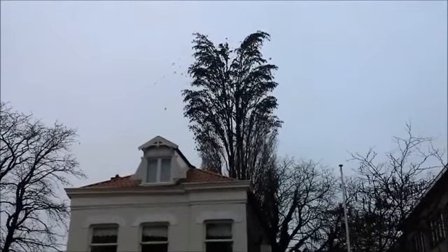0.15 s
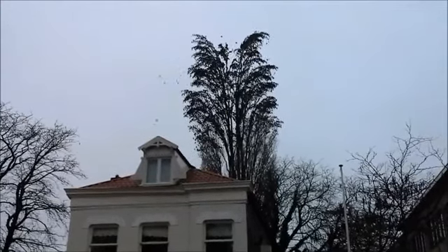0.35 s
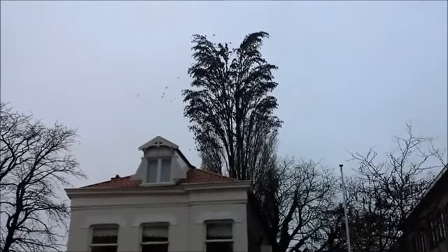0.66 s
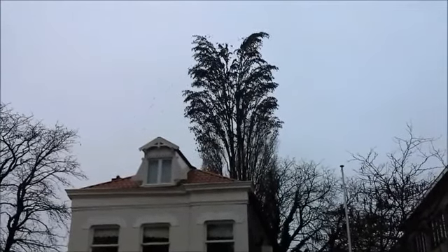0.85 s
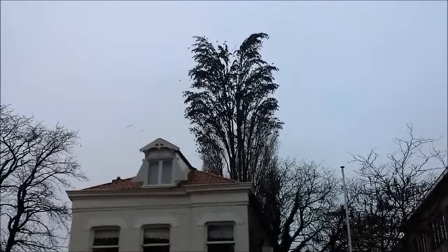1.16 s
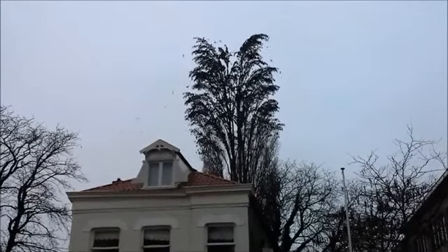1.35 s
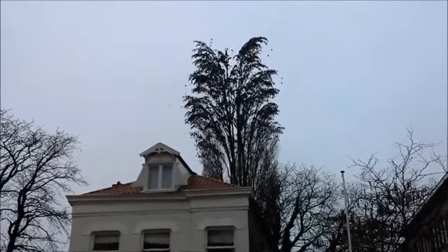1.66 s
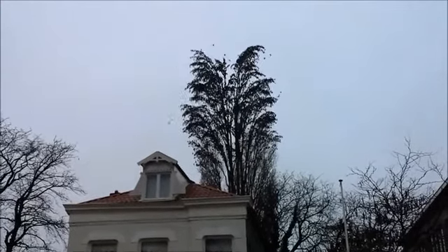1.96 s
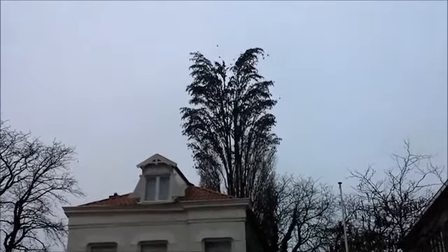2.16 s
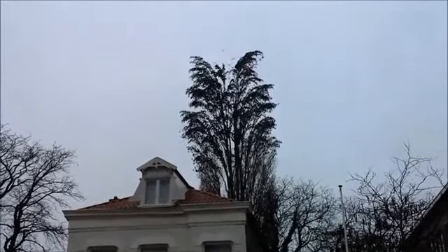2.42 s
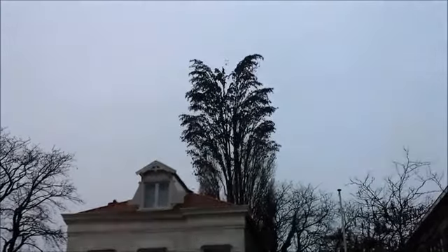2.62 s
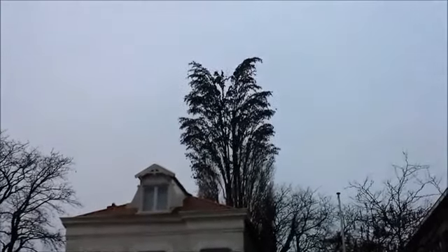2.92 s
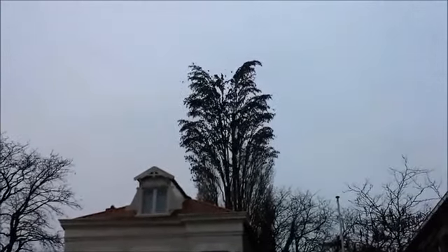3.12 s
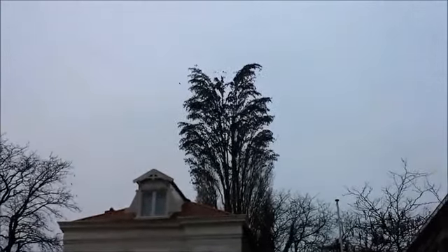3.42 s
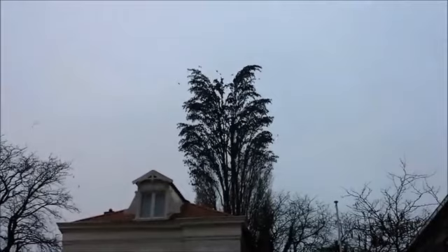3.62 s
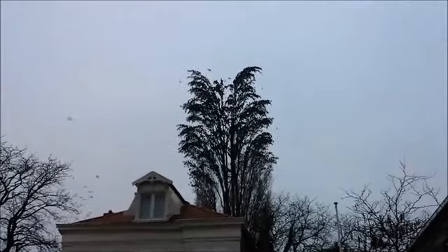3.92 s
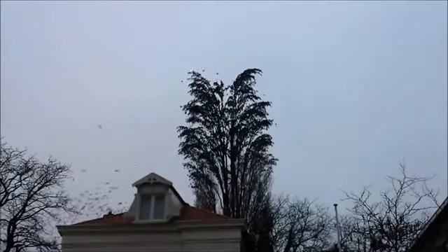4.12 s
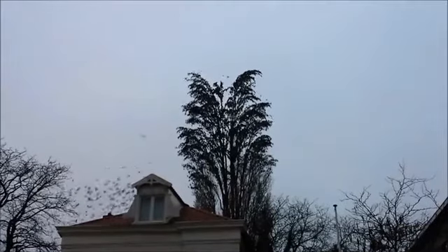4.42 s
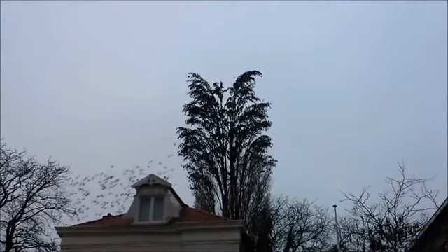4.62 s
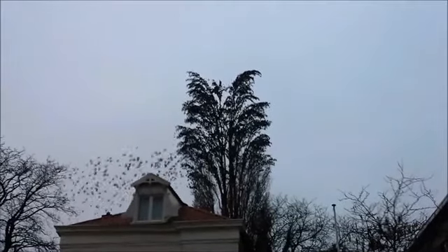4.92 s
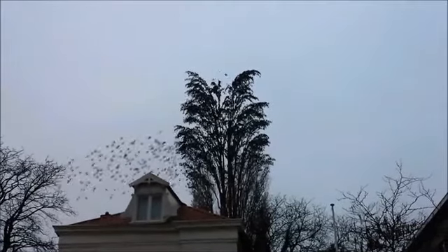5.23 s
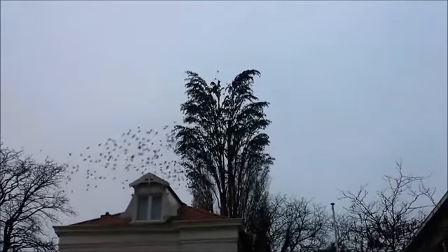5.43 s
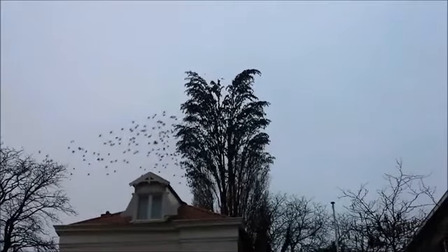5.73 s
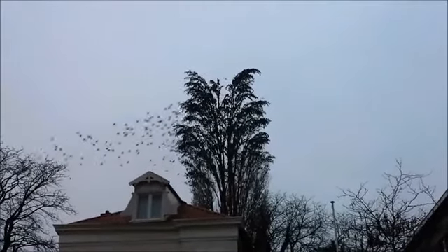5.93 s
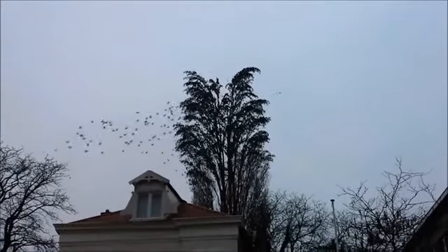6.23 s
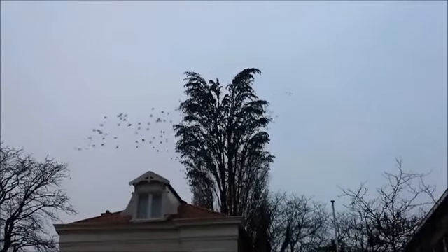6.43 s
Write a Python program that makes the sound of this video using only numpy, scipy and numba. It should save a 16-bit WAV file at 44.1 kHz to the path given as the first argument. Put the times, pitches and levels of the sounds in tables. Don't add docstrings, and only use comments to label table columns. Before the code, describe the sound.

A very large flock of starlings fills a tall tree beyond a house with continuous shrill chatter. Nearer birds poke out with rough squeaks, thin seeps, quick squabbles and bent whistles, while countless others blur into a bright hiss. Distant traffic and wavering engine hums lie low underneath, with slight wind and a few dull knocks. Small stereo camera microphone outdoors, some distance away, with short diffuse echoes and dull extreme treble.

```python
import sys
import numpy as np
from scipy import signal
from scipy.fft import rfft, irfft, next_fast_len
from scipy.io import wavfile
from scipy.ndimage import uniform_filter1d
from numba import njit

SR = 44100
rng = np.random.default_rng(int(sys.argv[2]) if len(sys.argv) > 2 else 0)


def voltage_ratio(level):
    return 10 ** (np.asarray(level, float) / 20)


def wav_record(signal):
    frames = np.transpose(np.atleast_2d(signal))
    bounded = np.clip(frames, -1, 1)
    quanta = np.round(bounded * 32767).astype(np.int16)
    wavfile.write(sys.argv[1], SR, quanta)


N = 289737
T = np.arange(N) / SR

# hz [Hz], level_db [dB per Hz]
CROWD_COLOUR = [(760, -50.5), (1300, -20), (1690, -15.0), (2260, -9), (3520, -12.5), (4620, -6.5),
                (5770, -4.5), (6420, -1.5), (7030, 0.5), (8020, -7.5), (8850, -13.5), (9300, -21),
                (9900, -21.5), (10400, -63.5)]
CROWD_DB = -26.5
# hz [Hz], left_lead [radians]
PORT_LEAD = [(1500, -2.5), (2000, 1.3), (3500, 1.1), (4300, -0.5), (5250, -0.6), (6000, -1.27), (7000, -1),
             (8300, 0.4)]
# hz [Hz], left_minus_right_db [dB]
BALANCE_DB = [(60, -0.5), (100, -1.0), (180, -1.0), (320, -1.0), (560, -1.5), (980, -1.0), (1710, 0.0),
              (2990, 0.0), (5230, -0.5), (9140, -5.0)]


def along(table, column=1):
    return np.interp(T, *np.array(table)[:, [0, column]].T)


def at_hz(table, hz):
    return np.interp(np.log(hz), np.log(np.array(table)[:, 0]), np.array(table)[:, 1])


def level(x, db):
    return x * voltage_ratio(db) / np.sqrt(np.mean(x ** 2))


def walk(rate):
    hold = int(SR / rate)
    steps = np.repeat(rng.standard_normal(N // hold + 1), hold)
    smooth = uniform_filter1d(uniform_filter1d(steps, hold), hold)[:N]
    return smooth / smooth.std()


def effort_db(s, hz):
    # time_s [s], high_squeaks_db [dB], lower_chatter_db [dB]
    efforts = [(0.0, -25.5, -29.5), (0.79, -27.5, -30.5), (1.06, -24.5, -29.5), (1.45, -28.5, -29.5),
               (1.8, -26, -33), (1.9, -28, -30.5), (2.38, -26.5, -31), (2.87, -25.5, -31.5),
               (3.04, -24, -30), (3.46, -25.5, -29.5), (3.82, -24, -28.5), (4.0, -25, -31.5),
               (4.46, -25.5, -30), (5.2, -27, -30), (5.35, -24.5, -31), (5.65, -27.5, -30.5),
               (6.1, -26, -30.5), (6.57, -28, -30.5)]
    high, low = (np.interp(s, T, c - c.mean()) for c in (along(efforts), along(efforts, column=2)))
    share = np.clip((hz - 5400) / 800, 0, 1)
    return (share * high + (1 - share) * low) * np.clip((hz - 2800) / 1200, 0, 1)


@njit
def sing(notes, waver, flutter, edge):
    out = np.zeros((2, N))
    for start, length, first, last, bend, left, right, lead, offset in notes:
        phase = 0.
        for i in range(max(0, int(-start)), min(int(length), N - int(start))):
            u = i / length
            k = (i + int(offset)) % N
            hz = first + (last - first) * u + 4 * bend * u * (1 - u) + waver[k]
            phase += 2 * np.pi * hz / SR
            size = min(1., u / edge, (1 - u) / edge) * flutter[k]
            out[0, int(start) + i] += left * size * np.sin(phase + lead)
            out[1, int(start) + i] += right * size * np.sin(phase)
    return out


def calls(s, length, first_hz, last_hz, bend_hz, db, pan_db, spread, waver_hz, flutter_db, edge):
    chance = rng.random((len(s), 2)).T
    lead = at_hz(PORT_LEAD, (first_hz + last_hz) / 2) + spread * (2 * chance[0] - 1)
    left, right = voltage_ratio(db + pan_db / 2), voltage_ratio(db - pan_db / 2)
    notes = np.array([s * SR, length * SR, first_hz, last_hz, bend_hz, left, right, lead, chance[1] * N])
    waver = waver_hz * (walk(350) + .25 * walk(40))
    return sing(np.ascontiguousarray(notes.T), waver, voltage_ratio(flutter_db * walk(120)), edge)


def peeps(count=90):
    middle_hz, spread_hz, crowding = 7100, 900, 4
    chance, bell = rng.random((count, 2)).T, rng.standard_normal((count, 2)).T
    odds = np.cumsum(voltage_ratio(crowding * effort_db(T, middle_hz)))
    s = np.interp((np.arange(count) + chance[0]) / count, odds / odds[-1], T)
    hz = middle_hz + spread_hz * np.tanh(bell[0])
    return np.array([s, 0.0494 * (0.66 + chance[1]), hz, hz + 120 * bell[1]])


def voiced(notes, near_db):
    hz = (notes[2] + notes[3]) / 2
    db = near_db + 0.72 * at_hz(CROWD_COLOUR, hz) + 0.49 * effort_db(notes[0], hz)
    return np.vstack([notes, db])


def near_calls(notes, **manner):
    s, length, first, last, db = notes
    pan_db = np.clip(-7 * ((first + last) / 2 - 6500) / 1000, -6.5, 2)
    return calls(s - .005, length + .01, first, last, 0 * s, db + .7, pan_db, **manner)


def near_birds():
    # start_s [s], length_s [s], first_hz [Hz], last_hz [Hz]
    squeaks = [(0.163, 0.11, 7670, 7800), (0.245, 0.12, 6460, 6670), (0.551, 0.055, 7380, 7400),
               (.422, 0.081, 7060, 7100), (0.703, 0.051, 6590, 6530), (0.877, 0.136, 7050, 7220),
               (1.11, 0.092, 7540, 7700), (1.2, .075, 6770, 6520), (1.695, 0.11, 6970, 7450),
               (1.704, 0.093, 6820, 6900), (1.793, 0.06, 7180, 6870), (2.657, 0.05, 6840, 7080),
               (2.716, 0.0265, 7500, 7490), (2.981, 0.073, 7220, 7230), (3.021, 0.095, 6940, 7070),
               (3.051, 0.11, 7520, 7350), (3.097, 0.057, 6750, 6820), (3.22, 0.047, 6770, 6600),
               (3.52, .057, 7070, 7060), (3.524, 0.1, 7450, 7300), (3.583, 0.098, 7050, 7370),
               (3.67, 0.12, 7220, 7030), (3.774, .112, 7440, 7350), (4.177, 0.17, 6350, 6960),
               (5.279, 0.045, 7520, 7360), (5.285, 0.096, 7120, 6780), (5.374, 0.19, 7040, 7400),
               (5.794, 0.053, 6300, 6800)]
    # start_s [s], length_s [s], first_hz [Hz], last_hz [Hz], level_db [dB]
    chatter = [(0.313, 0.082, 6900, 5500, -32), (0.344, 0.073, 4600, 4490, -38),
               (0.73, 0.16, 6540, 6300, -32), (0.934, 0.27, 6220, 6030, -34),
               (1.141, 0.017, 1800, 1810, -40), (1.781, 0.064, 6200, 6556, -26),
               (2.608, 0.165, 5890, 5450, -38), (2.67, .072, 5230, 4900, -39),
               (2.928, .122, 5984, 5420, -39), (3.096, 0.11, 6050, 6240, -29.5),
               (3.66, 0.145, 6000, 6200, -35), (3.67, 0.051, 5300, 5270, -37),
               (4.28, 0.07, 6080, 6053, -30), (4.351, 0.041, 5050, 4980, -32),
               (4.62, 0.052, 6212, 6380, -38), (5.556, 0.051, 4500, 4437, -40),
               (5.6, 0.072, 5090, 5080, -39), (5.686, .045, 4350, 4420, -43),
               (5.948, 0.144, 5470, 5650, -34)]
    # start_s [s], length_s [s], first_hz [Hz], last_hz [Hz]
    seeps = [(0.21, 0.085, 8350, 8300), (0.274, 0.15, 8620, 8460), (0.42, 0.072, 8420, 8180),
             (0.762, .07, 8060, 7650), (.816, .195, 8880, 8530), (1.014, 0.092, 7900, 7890),
             (1.231, 0.044, 7860, 8030), (1.27, .065, 8550, 8500), (1.745, 0.12, 7760, 7700),
             (2.727, 0.1, 8200, 7850), (3.02, 0.18, 7710, 7630), (3.091, 0.11, 8420, 8360),
             (3.697, 0.14, 8445, 8650), (4.04, .1, 8300, 8350), (4.076, 0.053, 8050, 7960),
             (4.16, 0.097, 7730, 8060), (4.648, 0.2, 8360, 8040), (4.649, 0.16, 9100, 8950),
             (4.687, 0.14, 8600, 8460), (4.869, 0.24, 7590, 8000), (5.279, 0.15, 8200, 7960),
             (5.403, 0.16, 8490, 8300)]
    # start_s [s], length_s [s], first_hz [Hz], last_hz [Hz], level_db [dB]
    strands = [(0.024, 0.072, 8850, 8950, -46), (0.522, 0.096, 8420, 8470, -43.5),
               (.71, .05, 8350, 8400, -41), (1.019, 0.166, 8700, 8550, -43),
               (1.316, .06, 8840, 8930, -44.5), (1.459, 0.053, 7940, 8120, -40),
               (1.552, .1, 7470, 7760, -34), (1.584, 0.069, 8600, 8500, -46), (1.9, .05, 6200, 6080, -33),
               (2.132, 0.071, 9300, 9400, -47), (2.417, 0.12, 9350, 9360, -47),
               (2.72, .09, 7600, 7600, -33), (3.087, .05, 9240, 9350, -45), (4.018, .11, 6540, 6260, -33.5),
               (4.3, 0.11, 9000, 9300, -45.5), (4.422, .07, 8800, 8820, -41.5),
               (4.558, .06, 9200, 9300, -47.5), (4.591, .08, 6750, 6200, -30.5),
               (5.168, 0.071, 8700, 8730, -39.5), (5.332, 0.1, 9050, 9150, -45),
               (5.559, 0.078, 7670, 7780, -38), (6.34, 0.033, 8000, 7950, -36),
               (6.394, .07, 6400, 6170, -37), (6.48, .07, 6300, 6400, -36)]
    thin = np.hstack([np.transpose(strands), voiced(np.transpose(seeps), -31), voiced(peeps(), -33)])
    rough = np.hstack([voiced(np.transpose(squeaks), -28.5), np.transpose(chatter)])
    return (near_calls(thin, spread=1.5, waver_hz=65, flutter_db=2.5, edge=0.14)
            + near_calls(rough, spread=1.36, waver_hz=95, flutter_db=3.0, edge=0.17))


def whistlers():
    # time_s [s], pitch_hz [Hz]
    whistles = [
        [(0.24, 6500), (0.3, 6690), (0.34, 6350), (0.38, 5660)],
        [(0.99, 7830), (1.04, 7600), (1.08, 8700), (1.12, 7820), (1.16, 7470)],
        [(2.04, 7070), (2.09, 8270), (2.14, 9070), (2.26, 8870), (2.35, 8800)],
        [(2.39, 5800), (2.44, 6000), (2.5, 6310), (2.58, 6200)],
        [(2.9, 7260), (2.95, 8040), (3.0, 8440), (3.05, 8970), (3.09, 8540)],
        [(3.85, 7390), (3.9, 7630), (3.95, 7920), (3.975, 7560), (4.005, 6870), (4.03, 6450), (4.06, 6280)],
        [(3.86, 7000), (3.9, 6810), (3.94, 6870), (3.97, 6700)],
        [(4.49, 8150), (4.52, 8200), (4.55, 8000), (4.59, 7800)],
        [(4.69, 6860), (4.745, 6900), (4.78, 8000), (4.81, 7300), (4.84, 6900)],
        [(4.86, 6000), (4.93, 6400), (4.97, 6500), (5.02, 6830)],
        [(4.84, 7380), (4.89, 7700), (4.97, 7880), (5.03, 7150)],
        [(5.42, 8230), (5.47, 8430), (5.53, 8230)],
        [(6.0, 7830), (6.04, 7950), (6.13, 7605), (6.29, 7060), (6.38, 6500)],
    ]
    nearness_db = [-28, -24.5, -29, -25, -24, -21, -26, -26, -27.5, -28, -27, -29, -26]
    out = np.zeros((2, N))
    waver_hz = 55 * walk(200) + 45 * walk(45)
    flutter_db = 3.2 * walk(70)
    for contour, near_db in zip(whistles, nearness_db):
        s, hz = np.transpose(contour)
        span = slice(int((s[0] - .01) * SR), int((s[-1] + .01) * SR))
        t = T[span]
        hz = uniform_filter1d(np.interp(t, s, hz), size=600)
        phase = 2 * np.pi * np.cumsum(hz + waver_hz[span]) / SR
        fade = np.clip(np.minimum(t - t[0], t[-1] - t) / 0.014, 0, 1)
        flutter = flutter_db[span] - flutter_db[span].mean()
        size = fade * voltage_ratio(0.76 * at_hz(CROWD_COLOUR, hz) + near_db - 1.5 + flutter)
        pan_db = at_hz(BALANCE_DB, hz) - 1.0
        left = voltage_ratio(pan_db / 2) * np.sin(phase + at_hz(PORT_LEAD, hz))
        right = voltage_ratio(-pan_db / 2) * np.sin(phase)
        out[:, span] += size * np.array([left, right])
    return out


def squabbles(count=8):
    # start_s [s], length_s [s], middle_hz [Hz], spread_hz [Hz], level_db [dB]
    flurries = [(.25, 0.082, 6500, 253, -34), (1.17, .08, 6840, 444, -32), (1.74, 0.096, 6900, 543, -30),
                (2.03, .06, 7100, 400, -33.5), (2.66, 0.14, 5370, 505, -33), (3.02, 0.15, 7100, 404, -31),
                (3.54, 0.13, 7100, 249, -28.5), (3.72, 0.13, 5100, 506, -40), (4.15, 0.047, 7490, 397, -37),
                (5.27, 0.11, 7100, 500, -29), (5.44, .1, 7100, 398, -33), (5.53, 0.17, 5100, 650, -38),
                (5.8, 0.094, 6800, 350, -28), (5.97, 0.086, 5570, 495, -32)]
    s, length, hz, spread_hz, db = np.repeat(flurries, count, axis=0).T
    bell = rng.standard_normal((len(s), 4)).T
    s = s + length * (np.arange(len(s)) % count) / count
    hz = hz + spread_hz * bell[0]
    glide = 250 * bell[1]
    pan_db = at_hz(BALANCE_DB, hz) - 1.5 + 2.5 * bell[3]
    return calls(s, 0 * s + 0.0349, hz - glide, hz + glide, 0 * s, db + 2.0 * bell[2], pan_db,
                 spread=1.3, waver_hz=118, flutter_db=3.5, edge=0.23)


def ticks():
    # start_s [s], length_s [s], pitch_hz [Hz]
    flickers = [(0.338, .05, 11700), (0.363, 0.046, 12230), (1.09, .03, 11690), (1.712, 0.043, 12500),
                (2.6, .05, 11940), (2.643, .05, 11500), (5.75, .025, 11050), (6.178, 0.068, 11630),
                (1.95, .04, 10000), (2.69, .05, 10300), (3.28, .05, 9850), (3.59, .04, 9850),
                (3.75, .07, 9950), (4.95, .04, 9800), (5.01, .06, 9800), (5.21, .04, 10100),
                (5.61, .04, 9900), (5.7, .04, 9850), (6.37, .13, 10000), (6.39, .12, 10250)]
    out = np.zeros((2, N))
    for s, length, hz in flickers:
        swell = np.sin(np.pi * np.clip((T - s) / length, 0, 1))
        out[1] += voltage_ratio(-54) * swell * walk(200) * np.sin(2 * np.pi * hz * T)
    return out


def crowd(count=7000):
    even, bell = rng.random((count, 3)).T, rng.standard_normal((count, 4)).T
    s = -.1 + (np.arange(count) + even[0]) / count * (T[-1] + .1)
    hz = 1300 + 8300 * ((np.arange(count) * (np.sqrt(5) - 1) / 2 + .02 * even[1]) % 1)
    length = 0.0196 + 0.061 * even[2] ** 2
    glide = 0.0398 * hz * bell[0]
    bend = 0.0248 * hz * bell[3]
    nearness_db = 2.6 * bell[1] * np.clip((hz - 3000) / 3500, .3, 1)
    db = at_hz(CROWD_COLOUR, hz) + effort_db(s + length / 2, hz) + nearness_db
    pan_db = at_hz(BALANCE_DB, hz) + 4.9 * bell[2]
    x = calls(s, length, hz - glide / 2, hz + glide / 2, bend, db, pan_db,
              spread=1.42, waver_hz=100, flutter_db=2.5, edge=0.16)
    return level(x, CROWD_DB - .8)


def bands(centres_hz, colour, width, motion_db):
    # hz [Hz], correlation [-1 to 1]
    likeness = [(60, 0.77), (120, 0.92), (250, 0.79), (520, 0.46), (1060, -0.32), (2170, 0.51),
                (4460, 0.38), (9140, -0.055)]
    size = next_fast_len(N)
    f = np.arange(1, size // 2 + 2) * SR / size
    a, b = rfft(rng.standard_normal((2, size)))
    c, pan_db = np.clip(at_hz(likeness, f), -1, 1), at_hz(BALANCE_DB, f)
    left = a * voltage_ratio(pan_db / 2)
    right = (c * a + np.sqrt(1 - c * c) * b) * voltage_ratio(-pan_db / 2)
    pair = voltage_ratio(at_hz(colour, f)) * np.array([left, right])
    out = np.zeros((2, N))
    for hz in centres_hz:
        window = np.clip(1 - abs(np.log2(f) - np.log2(hz)) / width, 0, 1)
        out += voltage_ratio(motion_db(hz)) * irfft(pair * window, size)[:, :N]
    return out


def far_flock():
    def motion_db(hz):
        return 1.0 * effort_db(T, hz) + 1.0 * walk(12)
    hiss = bands(1250 * 2 ** np.arange(0, 3.1, 1 / 3), CROWD_COLOUR, 1 / 3, motion_db)
    return level(hiss, CROWD_DB - .3)


def street(x, t60, wet_db):
    t = T[:SR // 2]
    decay = np.exp(-np.log(1000) * t / t60) * (t > .006)
    tail = level(rng.standard_normal((2, len(t))) * decay, wet_db) / np.sqrt(len(t))
    return x + signal.fftconvolve(x.mean(0, keepdims=True), tail, axes=1)[:, :N]


def town():
    # hz [Hz], level_db [dB per Hz]
    rumble = [(12, -39), (20, -14.5), (98, 1.5), (129, -3.5), (163, -2.5), (290, -4.5), (373, -9.5),
              (455, -11.5), (677, -10), (1050, -10.5), (1250, -14.5), (1500, -15.5), (1950, -35),
              (3300, -120)]
    swell = walk(0.36)
    def motion_db(hz):
        return .5 * swell + 1.2 * walk(4.67)
    return level(bands(22 * 2 ** np.arange(0, 6.1, .5), rumble, .5, motion_db), -37.5)


def engines():
    # from_s [s], to_s [s]
    spans = [(0, 1.2), (1.6, 2.42), (2.7, 3.67), (3.2, 4.55), (4.25, 4.95)]
    # pitch_hz [Hz], level_db [dB]
    drones = [
        [(96.9, -42), (247.6, -45.5)],
        [(91.5, -57), (156.1, -48), (209.9, -44.5)],
        [(161.5, -43.5), (199.2, -46.5)],
        [(107.7, -39)],
        [(75, -50.5), (166.9, -43.5), (387.6, -58)],
    ]
    out = np.zeros(N)
    waver = 1 + 0.011 * walk(6.5)
    swell_db = 1.8 * walk(9)
    for (start, end), lines in zip(spans, drones):
        span = slice(int(start * SR), int(end * SR))
        heard = np.clip(np.minimum(T[span] - start, end - T[span]) / 0.13, 0, 1)
        for hz, db in lines:
            own = rng.integers(N // 2) + np.arange(len(heard))
            tone = np.sin(2 * np.pi * hz * np.cumsum(waver[own]) / SR)
            out[span] += heard * voltage_ratio(db - 1.0 + swell_db[own]) * tone
    return out


def wind():
    # start_s [s], length_s [s], level_db [dB]
    gusts = [
        (.1, 1.23, -57),
        (1.447, 1, -52),
        (4.33, 1.1, -46),
    ]
    low_band = signal.butter(2, [20, 55], "band", fs=SR, output="sos")
    a, b = signal.sosfilt(low_band, rng.standard_normal((2, N)))
    strength = voltage_ratio(-59.5)
    for s, length, db in gusts:
        rise = np.clip((T - s) / 0.092, 0, 1)
        fall = np.exp(-np.clip(T - s - length, 0, None) / 0.27)
        strength = strength + voltage_ratio(db) * rise * fall
    return level(np.array([a + .3 * b, a - .3 * b]), -2.2) * strength


def knocks():
    # start_s [s], peak_db [dB], pitch_hz [Hz], ring_t60_s [s], rise [Hz per s]
    hits = [
        (1.38, -35, 620, 0.17, 0),
        (2.995, -34, 446, 0.069, 2),
        (4.682, -25.5, 530, 0.034, 0),
        (6.44, -41, 810, .1, 800),
        (6.515, -37, 935, 0.2, 1500),
    ]
    out = np.zeros(N)
    for s, db, hz, t60, rise in hits:
        t = np.clip(T - s, 0, None)
        ring = np.sin(2 * np.pi * (hz + rise * t / 2) * t)
        out += voltage_ratio(db) * ring * np.exp(-np.log(1000) * t / t60) * (1 - np.exp(-t / 0.001))
    return out


def scene():
    birds = street(near_birds() + whistlers() + crowd() + squabbles(), t60=.25, wet_db=-8)
    return birds + far_flock() + town() + engines() + wind() + knocks()


def band_limit(x):
    return signal.sosfilt(signal.butter(12, 13000, fs=SR, output="sos"), x)


def record(dry):
    # time_s [s], edge_hz [Hz]
    top = [(0, 9450), (.35, 9300), (.85, 9450), (1, 9000), (1.15, 9350), (1.28, 9050), (1.4, 9500),
           (1.78, 9150), (2.1, 9600), (2.55, 9550), (2.6, 9250), (2.7, 9600), (2.9, 9150), (3.05, 9550),
           (4.7, 9550), (5.4, 9400), (6.1, 9600), (6.57, 9550)]
    f, t, frames = signal.stft(dry, SR, nperseg=2048)
    left_jumps = 130 * walk(40) - 250 * np.clip(walk(10), 0, None)
    right_jumps = 130 * walk(40)
    edges = [np.interp(t, T, along(top) + jumps) for jumps in (left_jumps, right_jumps)]
    edge_hz = 172 * np.round(np.array(edges) / 172)
    kept = signal.istft(frames * (f[:, None] < edge_hz[:, None]), SR, nperseg=2048)[1][:, :N]
    return band_limit(kept + ticks())


dry = scene()
out = record(dry)
wav_record(out)
```